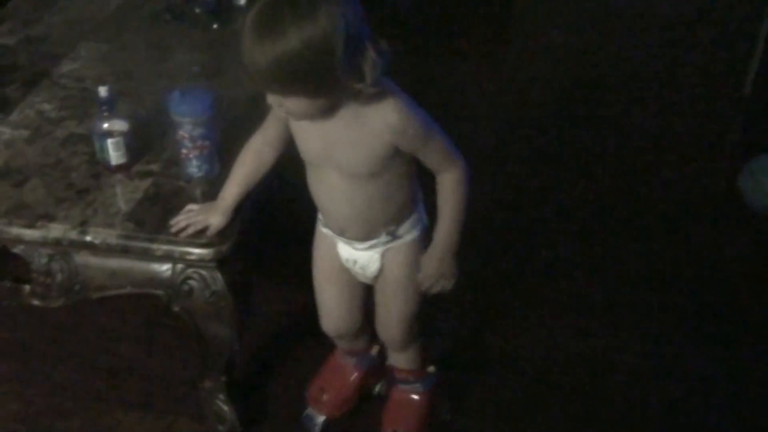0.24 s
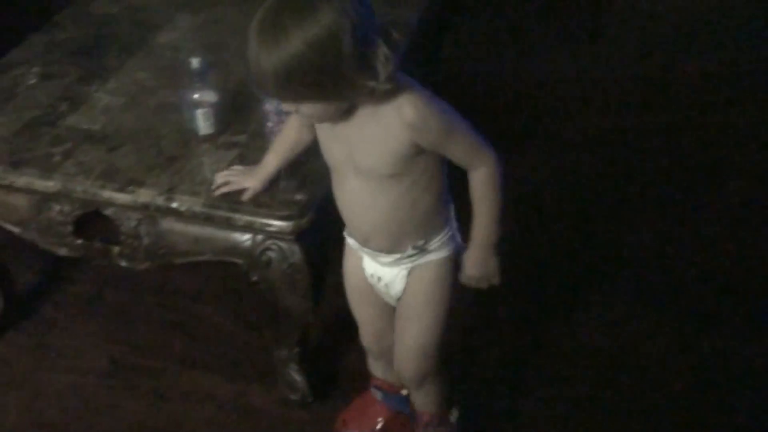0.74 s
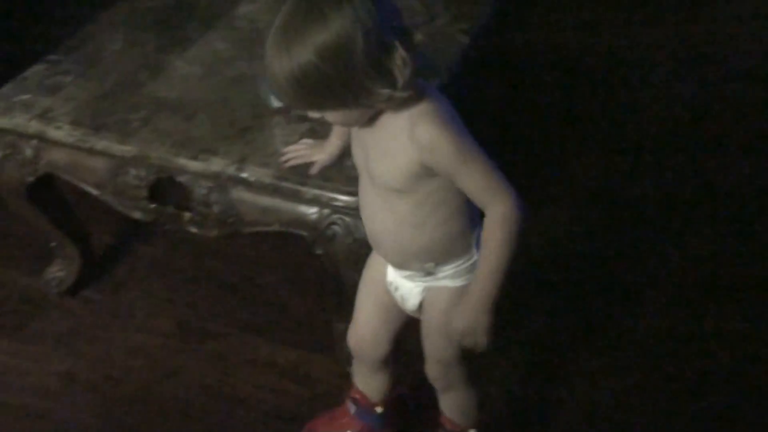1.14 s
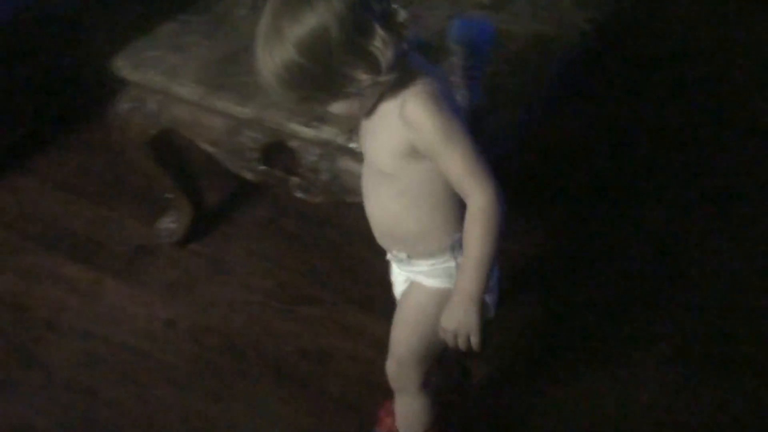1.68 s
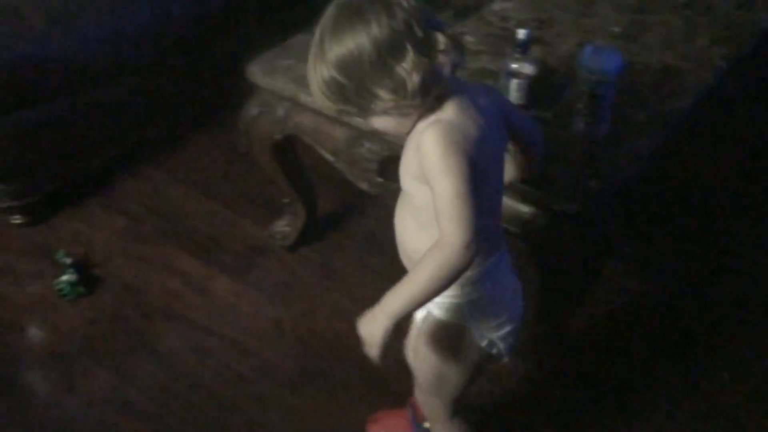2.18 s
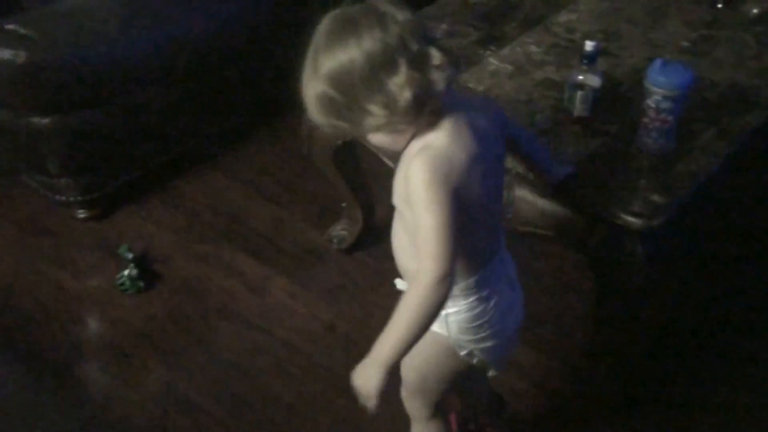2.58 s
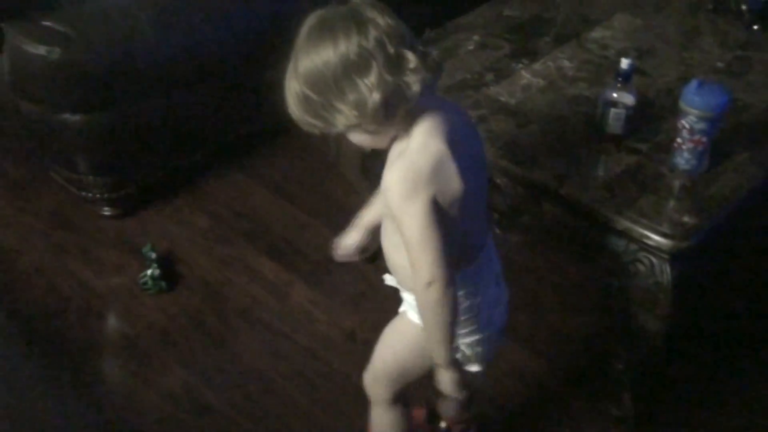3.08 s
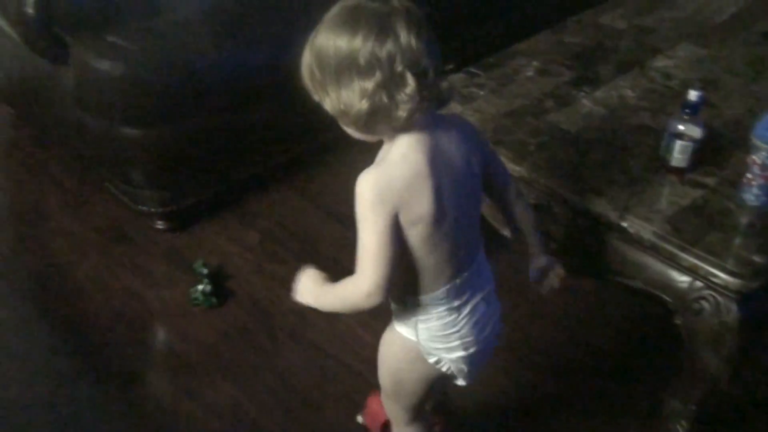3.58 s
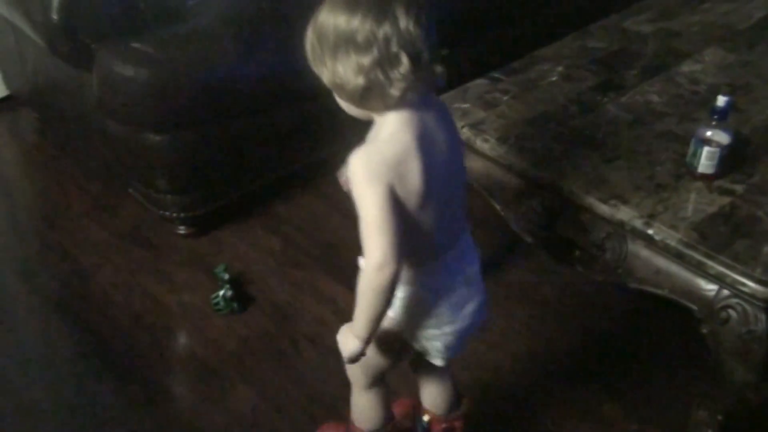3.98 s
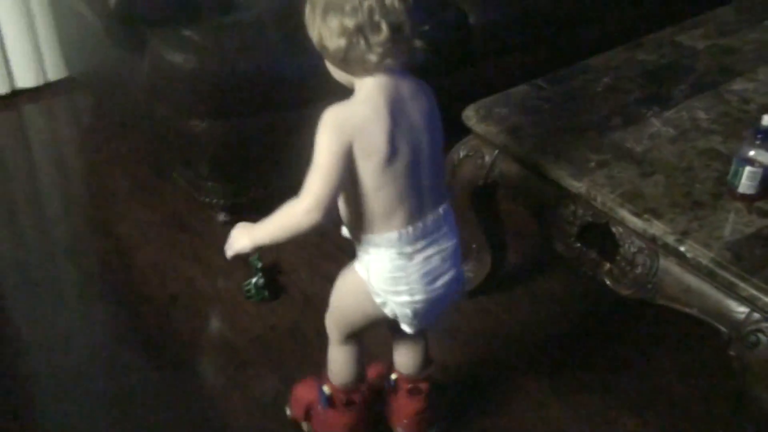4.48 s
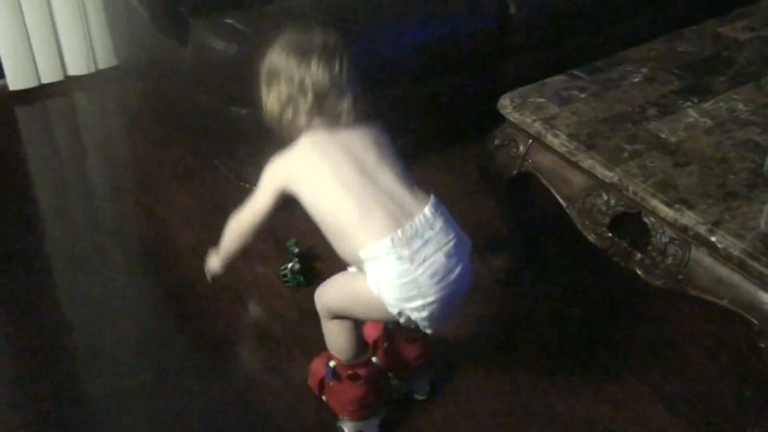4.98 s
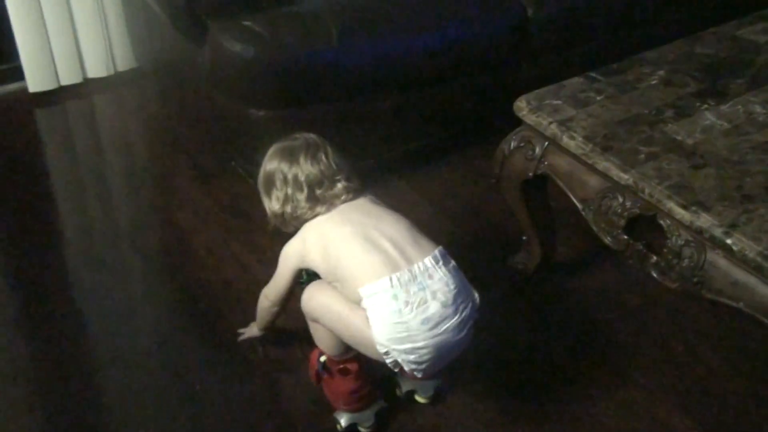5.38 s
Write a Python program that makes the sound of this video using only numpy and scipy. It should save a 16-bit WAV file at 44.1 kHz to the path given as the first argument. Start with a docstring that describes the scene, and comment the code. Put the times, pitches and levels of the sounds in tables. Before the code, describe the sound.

Hard plastic toy skate wheels clack and rattle unevenly on a wooden floor in a bare, ringing room, with faint metallic jingles between steps.

```python
"""In a bare, ringing room, a small child shuffles over a wooden floor in plastic toy roller skates.
Steps clack the wheels down and let them chatter: noisy contacts ring the floor and the plastic shell.
Between steps the wheels rattle along as a train of small knocks; bursts of noise make skids and scuffs.
Loose metal on the axles jingles as shaken resonances, and a boot taps the boards softly.
Under it lie filtered noise for the still house and a faint hum of wavering sine waves."""
import sys
import numpy as np
from scipy import signal
from scipy.fft import rfft, irfft, next_fast_len
from scipy.io import wavfile
from scipy.ndimage import uniform_filter1d

SR = 44100
rng = np.random.default_rng(int(sys.argv[2]) if len(sys.argv) > 2 else 0)


def master(y):
    """Save y as 16-bit WAV."""
    cut = np.clip(np.atleast_2d(y).T, -1, 1)
    pcm = np.round(cut * 32767)  # scale
    wavfile.write(sys.argv[1], SR, pcm.astype(np.int16))


N = 248718
TIME = np.arange(N) / SR


def amp(db):
    """Turns decibels into a plain gain."""
    return 10 ** (np.asarray(db) / 20)


def unit(x):
    """Scales to an rms of one."""
    return x / np.sqrt(np.mean(x ** 2) + 1e-20)


def read(points, hz):
    """Reads a curve over frequency, joining its points on a log-frequency axis."""
    f, value = np.transpose(points)
    return np.interp(np.log(hz + 1), np.log(f + 1), value)


def over_time(points):
    """Reads a curve at every moment of the scene."""
    return np.interp(TIME, *np.transpose(points))


def add(mix, s, sound):
    """Lays a sound into the mix at time s."""
    part = mix[max(round(s * SR), 0):][:len(sound)]
    part += sound[:len(part)]


def hump(hz, centre_hz, width_hz):
    """Gain of one resonance, 1 at its centre."""
    return 1 / np.sqrt(1 + (2 * (hz - centre_hz) / width_hz) ** 2)


def click(gain):
    """A click of unit energy with this spectrum, starting at once (minimum phase)."""
    both_halves = np.r_[gain, gain[-2:0:-1]]
    log_gain = np.log(np.maximum(both_halves, 1e-5))
    wave = np.fft.ifft(np.exp(np.conj(signal.hilbert(log_gain)))).real
    return wave / np.linalg.norm(wave)


def colour(x, gain_at):
    """Filters a long signal by a gain over frequency, to an rms of one."""
    n = next_fast_len(len(x), True)
    spectrum = rfft(x, n) * gain_at(np.fft.rfftfreq(n, 1 / SR))
    return unit(irfft(spectrum, n)[:len(x)])


def slow_noise(width_hz):
    """Random wavering of rms one, mostly slower than about half this width."""
    return colour(rng.standard_normal(N), lambda hz: hump(hz, 0, width_hz) ** 2)


def contacts(per_s, spread_db, size):
    """A random train of small contacts of uneven strength; none stands far above the rest."""
    strength = amp(spread_db * np.minimum(rng.exponential(1, size), 2.5))
    sign = rng.choice([-1, 1], size)
    touching = rng.random(size) < per_s / SR
    return unit(strength * sign * touching)


def clatter(push, seconds):
    """Each contact sets the skate's many small parts clattering: noise whose energy dies away."""
    fall = np.exp(-1 / (SR * max(seconds, .0001)))
    energy = signal.lfilter([1 - fall], [1, -fall], push)
    return np.sqrt(energy) * rng.standard_normal(len(push))


def evenly(force, size=24):
    """Gives a burst unit energy, spread evenly over the bands."""
    z = rfft(force, 2 * len(force))
    power = uniform_filter1d(abs(z) ** 2, 4 * size)
    even = irfft(z / np.sqrt(power + 1e-12))[:len(force)]
    return even / np.linalg.norm(even)


# tone of the still house: (frequency [Hz], relative level [dB per Hz])
HOUSE_TONE = [(20, -19), (60, -3.5), (100, -6.5), (160, 2), (250, -6), (350, -2.5), (600, -11), (1100, -6),
              (2000, -20), (16000, -33)]
# steady notes of the hum: (frequency [Hz], level [dB])
HUM_NOTES = [(120, -59.5), (195, -68), (390, -63.5)]
HOUSE_DB = -51.5
HUM_WAVER = .15  # rms share by which the loudness of each note wavers


def house(side_db=-22):
    """Noise makes the soft rumble and hiss, nearly alike in both ears; wavering sines make the hum."""
    mid, side = (colour(rng.standard_normal(N), lambda hz: amp(read(HOUSE_TONE, hz))) for _ in range(2))
    side = amp(side_db) * side
    out = amp(HOUSE_DB) * np.array([mid + side, mid - side])
    for hum_hz, db in HUM_NOTES:
        loudness = amp(db) * np.sqrt(2) * (1 + HUM_WAVER * slow_noise(9.2))
        out += loudness * np.sin(2 * np.pi * (hum_hz * TIME + rng.random()))
    return out


PUSH_S, BRAKE_DB_PER_S = 0.023, 181  # each stretch of rolling swells quickly and ends quickly


def stretch(start, length, coast_db_per_s):
    """Gain of one stretch of rolling: a quick rise, a slow loss of speed, a quick end."""
    t = np.maximum(TIME - start, 0)
    braking = BRAKE_DB_PER_S * np.maximum(t - length, 0)
    return np.minimum(t / PUSH_S, 1) * amp(-coast_db_per_s * t - braking)


# tone of hard plastic rolling on wood: (frequency [Hz], relative level [dB])
RATTLE_TONE = [(60, -61), (250, -13.5), (550, -10.5), (900, -4), (1130, 4.5), (1600, 3), (2400, 5),
               (3800, 1), (7500, -12), (10000, -17.5), (14000, -51)]
# one row a stretch of rolling, also played by the jingle; a long glide may take two:
# (start [s], length [s], relative rattle level [dB], relative jingle level [dB])
ROLLING_STRETCHES = [ (0.113, 0.13, -30.5, -50), (0.56, 0.15, -36.5, -45.5), (0.943, 0.028, -27, -40),
                     (1.475, 0.27, -25.5, -38.5), (2.154, 0.06, -25, -41), (2.253, 0.14, -32, -35.5),
                     (2.592, 0.024, -36, -51.5), (3.017, 0.092, -31.5, -38), (3.13, 0.16, -31, -40),
                     (3.793, 0.32, -29.5, -39), (4.397, 0.061, -31.5, -35), (4.49, 0.16, -34, -38),
                     (4.967, 0.3, -33, -42)]
COAST_DB_PER_S = 29.5
FIDGET_DB, CROUCH_S = -49.5, 4.94  # the wheels fidget faintly until the child crouches


def rolling(per_s=270, spread_db=5.0, crack_s=0.0015, lump_db=-1.6, level_db=-1, size=1024):
    """Loose wheels knock on their axles and the grain of the boards, hundreds of times a second, in lumps."""
    motion = amp(FIDGET_DB) * stretch(0, CROUCH_S, 0)
    for s, length, db, _ in ROLLING_STRETCHES:
        motion += amp(db) * stretch(s, length, COAST_DB_PER_S)
    lumps = lump_db * slow_noise(61)
    knocks = clatter(contacts(per_s, spread_db, N) ** 2, crack_s)
    knocks *= motion * amp(lumps + level_db)
    tone = amp(read(RATTLE_TONE, np.fft.rfftfreq(size, 1 / SR)))
    return signal.oaconvolve(knocks, click(tone))[:N]


# one row a wheel strike, a further ring of one, or a strike already dying away:
# (time [s], relative level [dB], floor knock [dB], treble slope [dB per octave above 3500 Hz],
# shell pitch [Hz], shell ring [dB], chatter decay [s])
STRIKES_AND_RINGS = [ (.001, -12.5, 4, -0.5, 3800, 6, 0.013), (.067, -11.5, 7, -2.5, 7200, 10, 0.008),
                     (.091, -19, 12, 13.5, 2820, 23, .0015), (.103, -17, 18, -10, 2860, 10, .0015),
                     (.413, -11, 10, 0, 2450, 7, 0.028), (.536, -16, -10, -5, 1920, 20, 0.0017),
                     (.540, -14.5, -2, 3, 3590, 9.5, 0.0036), (.709, -15.5, 11.5, 2, 3570, 1, 0.014),
                     (.729, -15, 9, 3, 3560, 10.5, 0.031), (.839, -9.5, 15.5, 2, 2710, 19, 0.0031),
                     (.859, -12.5, -20, 1, 2830, 8, 0.021), (.958, -16, 9, 3.5, 2520, 4, 0.026),
                     (1.142, -13, -0.5, -1.5, 1153, 22, .014), (1.150, -17, 8, 3, 1480, 22, 0.047),
                     (1.158, -14, -3, -2, 3570, 10.5, 0.053), (1.406, -11, 0.5, 3, 2030, 7, 0.025),
                     (1.493, -18, 4, -2, 3200, 13, .014), (1.541, -17.5, 0, -1, 3730, 11, 0.017),
                     (1.560, -11.5, 12, 5, 3700, 6, 0.03), (1.664, -18, 0, -9, 2820, 9, 0.013),
                     (2.066, -8, 8.5, 0, 1580, 5.5, 0.033), (2.142, -13, -10, 1.5, 6260, 6.5, 0.0047),
                     (2.320, -17, -2, 6, 3130, 10.5, 0.02), (2.849, -8, 11, 2.5, 3240, 5, 0.025),
                     (2.870, -10.5, -38, -4.5, 2850, 4, 0.062), (3.125, -17, -4, 6, 3500, 14, 0.0039),
                     (3.587, -9, 12, 2, 2650, 4, 0.016), (3.618, -12.5, 0, -3, 1466, 14, 0.03),
                     (3.696, -11.5, -22, 2, 3480, 3.5, 0.025), (3.898, -19.5, -14, 6, 3060, 14, .0015),
                     (3.961, -16.5, -18, 3.5, 3800, 6, 0.02), (4.249, -12, 5.5, -1.5, 2350, 3.5, 0.019),
                     (4.316, -13, 3, 2, 3300, 3, 0.033), (4.495, -19, -9, 4, 3060, 12.5, 0.01),
                     (4.532, -19, 4, 0.5, 3340, 8, 0.042), (4.933, -24.5, 18, 8, 2450, 13, 0.027),
                     (4.956, -24, 0, -1.5, 3600, 4, .014), (5.145, -26, -2, 2.5, 3720, -2, 0.0044),
                     (5.2, -23.5, 2, -1.5, 2750, 2, 0.0051), (5.23, -25.5, -4, 4.5, 3680, 8, 0.004),
                     (5.549, -38, 4, -3, 2270, 15, 0.0024)]
# tone of hard plastic striking wood: (frequency [Hz], relative level [dB])
STRIKE_TONE = [(60, -21.5), (500, -13), (750, -5), (3400, 3.5), (4800, -2.5), (7000, -7), (10000, -16.5),
               (14000, -22), (16000, -48)]
# the hollow knock of the boards changes from spot to spot: (time [s], pitch [Hz])
BOARD_PITCH = [(.41, 1150), (.8, 1290), (1.15, 1200), (1.56, 1260), (2.85, 1226)]
KNOCK_WIDTH_HZ = 480
SHELL_Q = 8.5  # shell pitch divided by the width of its resonance: it rings broadly


def clacks(chatter_energy_per_s=60, chatter_per_s=340, chatter_spread_db=4.0, crack_s=0.0015,
           flat_s=0.019, level_db=22, size=2048):
    """Wheels hit the boards: floor and plastic shell ring, and the other wheels chatter on."""
    out, hz, t = np.zeros(N), np.fft.rfftfreq(size, 1 / SR), TIME[:4 * size]
    octaves = np.clip(np.log2((hz + 1) / 3500), 0, 1.5)  # the treble slope levels off after 1.5 octaves
    for s, db, knock_db, treble_db, shell_hz, shell_db, chatter_s in STRIKES_AND_RINGS:
        knock_hz = np.interp(s, *np.transpose(BOARD_PITCH))
        knock = knock_db * hump(hz, knock_hz, KNOCK_WIDTH_HZ) ** 2
        shell = 1 + (amp(shell_db) - 1) * hump(hz, shell_hz, shell_hz / SHELL_Q) ** 2
        gain = amp(read(STRIKE_TONE, hz) + treble_db * octaves + knock) * shell
        bounces = contacts(chatter_per_s, chatter_spread_db, len(t)) * np.exp(-t / max(chatter_s, .001))
        push = chatter_energy_per_s * bounces ** 2 / SR
        # a flat landing chatters long and puts less into the first contact
        push[0] = np.exp(-chatter_s / flat_s)
        force = evenly(clatter(push, crack_s))
        add(out, s, amp(db + level_db) * signal.fftconvolve(force, click(gain)))
    return out


def ticks(per_s=130, spread_db=2.0, crack_s=0.0008, centre_hz=11300, width_hz=9500, level_db=-12.5):
    """The shaken metal parts also meet with short, bright ticks."""
    meetings = clatter(contacts(per_s, spread_db, N) ** 2, crack_s)
    return amp(level_db) * colour(meetings, lambda hz: hump(hz, centre_hz, width_hz) ** 4)


CHINK_S = .018  # time a chink's shove takes to swell to its peak


def nudge(start):
    """Gain of one brief shove: it swells and is gone."""
    u = np.maximum(TIME - start, 0) / CHINK_S
    return u * np.exp(1 - u)


# loose metal on the axles: part name -> (pitch [Hz], relative level [dB], time to fade by 60 dB [s])
AXLE_PARTS = {"A": (3760, 4, .02), "B": (5905, -2, .12), "C": (6660, -1, .12), "D": (8415, -2, .13),
              "E": (11605, -4.5, .065), "F": (13417, -7.5, .09)}
# one metal part chinks out above the rattle: (time [s], part name, level of the shove [dB])
METAL_CHINKS = [(.96, "E", -47), (1.6, "D", -43), (2.33, "D", -54), (2.39, "C", -37), (3.25, "E", -54),
                (4.005, "B", -49), (4.5, "F", -50), (5.0, "C", -39)]
JINGLE_COAST_DB_PER_S = 32  # the jingle fades at its own speed during a stretch of rolling
JINGLE_FITS_DB = 6  # each part is shaken unevenly, by up to this much either way


def jingle(per_s=200, spread_db=0.0, level_db=-7, wander_hz=40):
    """Small metal parts tremble in fits while rolling and some chink out; each pitch wanders in its seat."""
    out, shake = np.zeros(N), np.zeros(N)
    for s, length, _, db in ROLLING_STRETCHES:
        shake += amp(db) * stretch(s, length, JINGLE_COAST_DB_PER_S)
    for part, (hz, db, t60) in AXLE_PARTS.items():
        wander = slow_noise(310)
        fits = amp(JINGLE_FITS_DB * np.tanh(slow_noise(33)))
        drive = amp(db + level_db) * shake * fits
        for s, which, chink_db in METAL_CHINKS:
            if which == part:
                drive += amp(chink_db) * nudge(s)
        hits = (drive + 1e-9) * contacts(per_s, spread_db, N)
        # a turning complex wave carries the wandering pitch; each hit then fades along it
        turn = np.exp(2j * np.pi * np.cumsum(hz + wander_hz * wander) / SR)
        fall = np.exp(-np.log(1000) / (t60 * SR))
        ring = signal.lfilter([np.sqrt(2 - 2 * fall ** 2)], [1, -fall], hits / turn)
        out += (turn * ring).imag
    return out + shake * ticks()


# dull knocks of a boot on the boards: (time [s], relative level [dB], pitch [Hz], width [Hz])
BOOT_TAPS = [(1.437, -33, 885, 300), (1.561, -32, 550, 352), (3.539, -32.5, 1110, 1070),
             (4.251, -29, 770, 403)]


def taps(level_db=22, size=1024):
    """A light, dead tap: one broad resonance that dies at once."""
    out, hz = np.zeros(N), np.fft.rfftfreq(size, 1 / SR)
    for s, db, pitch_hz, width_hz in BOOT_TAPS:
        add(out, s, amp(db + level_db) * click(hump(hz, pitch_hz, width_hz) ** 2))
    return out


# skids and scuffs, with one low soft rumble, perhaps cloth or the body moving:
# (start [s], length [s], relative level [dB], pitch [Hz], width [Hz])
SKIDS_AND_SCUFFS = [(2.382, 0.1, -29, 3900, 972), (3.231, 0.092, -30.5, 1920, 760),
                    (4.58, 0.23, -46.5, 400, 600), (4.613, 0.13, -35, 6840, 5551),
                    (4.845, 0.087, -39, 2620, 1110)]


def skids(slips_per_s=2500):
    """Skids, scuffs and one low soft rumble: fast random slips, through one resonance each."""
    out = np.zeros(N)
    for s, length, db, pitch_hz, width_hz in SKIDS_AND_SCUFFS:
        slips = colour(contacts(slips_per_s, 11.0, SR), lambda hz: hump(hz, pitch_hz, width_hz) ** 2)
        stroke = np.hanning(int(np.clip(length, .01, 1) * SR))
        add(out, s, amp(db) * slips[:len(stroke)] * stroke)
    return out


# how long the room rings: (frequency [Hz], time to fade by 60 dB [s])
ROOM_FADE = [(600, 0.66), (1300, 1.0), (3000, 0.9), (8000, 0.64), (14000, 0.42)]


def room(x, side_db=-8.5, early_db=2, early_s=0.06, gap_s=0.00031, apart_hz=380):
    """Dense reflections, each band dying at its own speed; two close microphones hear them much alike."""
    t = TIME[:int(1.3 * SR)]
    hz, frame_s, z = signal.stft(rng.standard_normal((2, len(t))), SR, nperseg=256)
    fade = np.exp(-np.log(1000) * frame_s / read(ROOM_FADE, hz)[:, None])
    tail = signal.istft(z * fade, SR, nperseg=256)[1][:, :len(t)]
    # the start is a little stronger, after a tiny gap
    tail *= amp(early_db * np.exp(-t / early_s)) * np.clip(t / gap_s - 1, 0, 1)
    tail /= np.linalg.norm(tail, axis=1, keepdims=True)
    mid, side = signal.fftconvolve(x[None], tail, axes=1)[:, :N]
    # long waves reach both microphones alike
    side = amp(side_db) * signal.lfilter(*signal.butter(1, apart_hz, "high", fs=SR), side)
    return np.array([mid + side, mid - side])


def blended_room(x, count=9):
    """Several random echo patterns blend in turn, so that no pitch stands out in the room's tail."""
    turn = TIME / .02  # the next pattern begins to fade in every 0.02 s
    out = np.zeros((2, N))
    for k in range(count):
        share = np.sin(np.pi / 2 * np.minimum((turn - k) % count, 2))
        out += room(x * share)
    return out


# the skates' straight path to the microphones changes as the child turns: (time [s], level [dB])
STRAIGHT_PATH = [(0, -5.5), (1.5, -2), (2.8, -8), (5.6, -4.5)]


def scene(wet_db=-2, tap_wet_db=-10, right_db=0.5):
    """Skates and taps are heard straight and through the room, a little to the right, over the house."""
    skates = clacks() + rolling() + jingle() + skids()
    tap = taps()
    straight = amp(over_time(STRAIGHT_PATH)) * skates + tap
    echoes = amp(wet_db) * blended_room(skates + amp(tap_wet_db) * tap)
    return (straight + echoes) * amp([[-right_db], [right_db]]) + house()


SQUEEZE = .6  # share of the excess level [dB] that the limiter takes away
EDGE_HZ = 16300  # the sound is cut off above this


def record(dry, limit_db=-20, sense_s=0.0059, ceiling_db=-7):
    """A quick limiter rounds off hard clacks, their first peaks saturate softly, and the top is cut."""
    fall = np.exp(-1 / (SR * sense_s))
    power = signal.lfilter([1 - fall], [1, -fall], (dry ** 2).mean(0))
    power_db = 10 * np.log10(power + 1e-12)
    held = dry * amp(-SQUEEZE * np.maximum(power_db - limit_db, 0))
    held = amp(ceiling_db) * np.tanh(held / amp(ceiling_db))
    low_pass = signal.firwin(511, EDGE_HZ, window=("kaiser", 9), fs=SR)
    return signal.oaconvolve(held, low_pass[None], "same")


dry = scene()
out = record(dry)
master(out)
```